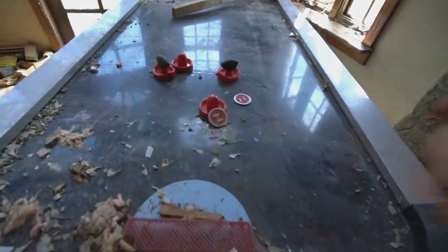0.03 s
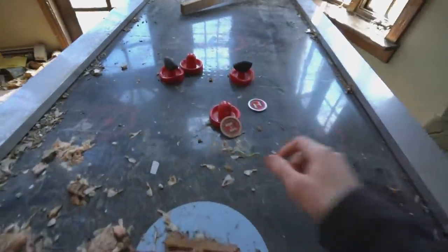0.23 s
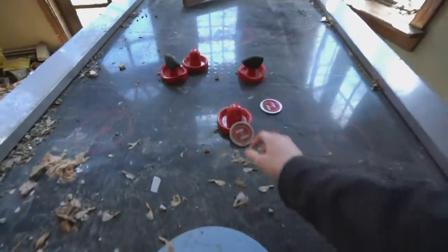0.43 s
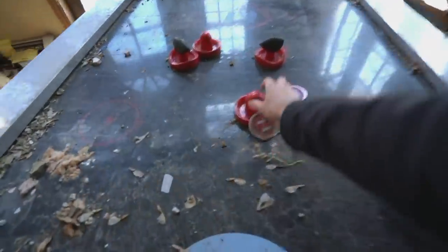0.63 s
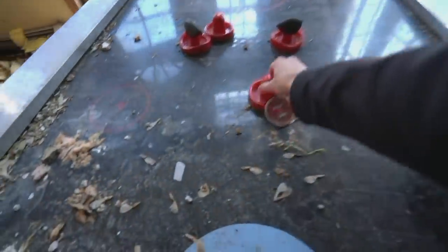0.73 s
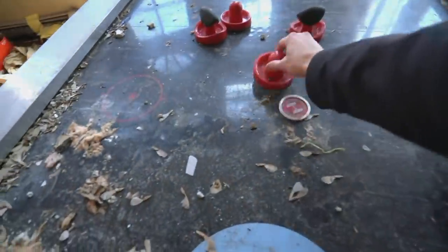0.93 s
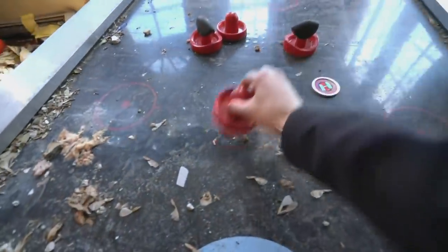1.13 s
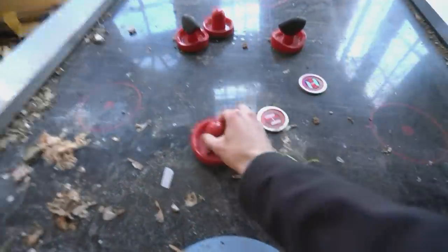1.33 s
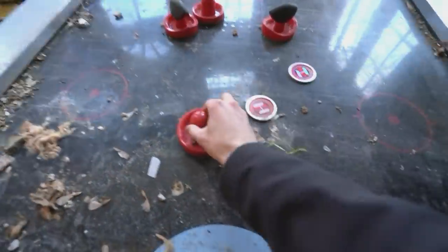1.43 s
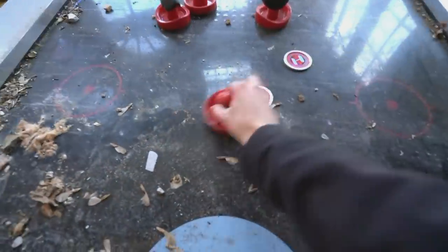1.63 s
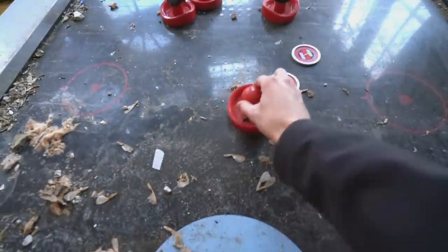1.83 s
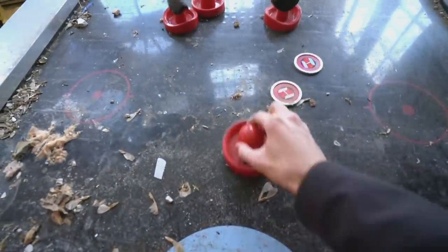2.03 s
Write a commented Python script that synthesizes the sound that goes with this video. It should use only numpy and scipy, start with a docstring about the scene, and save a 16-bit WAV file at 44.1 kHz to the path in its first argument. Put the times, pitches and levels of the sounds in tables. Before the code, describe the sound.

A plastic mallet scrapes across a gritty air hockey table, close by in a bare room. First a sleeve swishes faintly. At 0.8 seconds a puck clacks sharply, then bounces a few times, settling by 1.1. The mallet lands with a soft thump near 1.4. From 1.6 to 1.9 it slides with a brief stuttering squeal, crunching grit and a hollow rumble, then fades.

```python
"""A sleeve swishes as a hand reaches over an air hockey table in a bare room. The lifted mallet tips
a puck off, which clacks and bounces to rest, each impact exciting the damped modes of puck and top.
The mallet is set down with a soft thump and pushed over the dusty top: its cup squeals by stick-slip,
grit crunches under the rim and the friction drives the table's resonances into a rumble."""
import sys
import numpy as np
from scipy import signal
from scipy.fft import rfft, irfft
from scipy.io import wavfile
from scipy.ndimage import uniform_filter1d

SR = 44100
rng = np.random.default_rng(int(sys.argv[2]) if len(sys.argv) > 2 else 0)


def dump_mix(stems):
    """Bounce the given channels to the path in sys.argv[1] as a 16-bit WAV at rate SR."""
    frames = np.atleast_2d(stems).T  # one column per channel
    limited = np.clip(frames, -1, 1)  # hard clip at full scale
    pcm = np.round(limited * 32767).astype(np.int16)
    wavfile.write(sys.argv[1], SR, pcm)


N = 91595

# spectrum of a hard contact, for puck and crumbs (f/Hz, level/dB)
CRACK_SPECTRUM = [(200, -47), (1000, 5.5), (1800, -1.5), (2800, 3), (4200, 0.5), (6500, -3), (7900, -11.5),
                  (8700, 3.5), (9600, -12.5), (16000, -33)]


def undb(db):
    """Amplitude ratio of a level in decibels."""
    return 10 ** (np.asarray(db) / 20)


def unit(x):
    """Normalisation to rms 1."""
    return x / np.sqrt(np.mean(x ** 2))


def clock():
    """Sample times, t/s."""
    return np.arange(N) / SR


def curve(rows):
    """Amplitude envelope interpolated through (t/s, level/dB)."""
    return undb(np.interp(clock(), *np.array(rows).T))


def across(rows):
    """Interpolation of (f/Hz, value) at every bin, on a logarithmic frequency axis."""
    hz, value = np.array(rows).T
    return np.interp(np.log(np.arange(N + 1) * SR / (2 * N) + 1), np.log(hz), value)


def shape(x, gain):
    """Linear filtering: the spectrum is multiplied by a gain per bin."""
    return irfft(rfft(x, 2 * N) * gain)[..., :N]


def colour(x, rows):
    """Minimum-phase, hence causal, filter with the response (f/Hz, level/dB)."""
    cepstrum = irfft(np.log(undb(across(rows))))
    cepstrum[1:N] *= 2
    return shape(x, np.exp(rfft(cepstrum[:N], 2 * N)))


def spread(pair):
    """Interaural coherence: two signals as mid and side, alike in the bass, wide in the treble."""
    side_level = [(40, -26), (130, -16.5), (300, -13), (700, -6), (1500, -4), (3000, 0.5), (12000, -2)]  # side relative to mid (f/Hz, level/dB)
    return pair[0] + shape(pair[1], undb(across(side_level))) * np.array([[1], [-1]])


def walk(rate):
    """Smooth random fluctuation of rms 1, with `rate` new values a second."""
    hold = max(int(SR / rate), 1)
    return unit(uniform_filter1d(rng.standard_normal(N)[np.arange(N) // hold], hold))


def grains(per_s, spread_db):
    """Shot noise: two independent streams of clicks of random size."""
    size = undb(spread_db * np.minimum(rng.exponential(size=(2, N)), 5))
    return size * rng.standard_normal((2, N)) * (rng.random((2, N)) < per_s / SR)


def ring(modes):
    """Impulse response as a sum of damped modes, alternating in sign by pairs."""
    t = clock()
    return sum((-1) ** (k // 2) * undb(db - 60 * t / t60) * np.sin(2 * np.pi * hz * t)
               for k, (hz, db, t60) in enumerate(modes)) / 2


def taps(rows, response):
    """Superposition of one response at each (t/s, level/dB)."""
    out = np.zeros(N)
    for s, db in rows:
        start = int(s * SR)
        out[start:] += undb(db) * response[:N - start]
    return out


def burst(spectrum, decay_s):
    """Contact noise with an exponential decay."""
    return unit(colour(rng.standard_normal(N), spectrum)) * np.exp(-clock() / decay_s)


def air(level_db=-52.5):
    """Stationary noise: the quiet air of the building, strongest in the bass."""
    spectrum = [(15, -51), (25, -3.5), (130, -2.5), (195, -11), (394, -7.5), (714, -13), (1290, -12.5),
                (1400, -21), (1790, -15.5), (2160, -25), (16000, -38)]  # ambient noise (f/Hz, level/dB)
    return undb(level_db) * unit(spread(colour(rng.standard_normal((2, N)), spectrum)))


def room(x, early_db=-4.5, tail_db=-11, early_decay_s=0.027, gap_s=0.0043):
    """Reverberation: early reflections from table and walls, then a diffuse tail decaying by band."""
    decay_times = [(100, 0.17), (350, 0.55), (900, .7), (3000, 0.63), (8000, 0.35), (16000, 0.1)]  # reverberation time (f/Hz, T60/s)
    t, tail = clock(), 0
    noise = spread(rng.standard_normal((2, N)))
    onset = np.clip(t / gap_s - 1, 0, 1)
    for k, (_, t60) in enumerate(decay_times):
        band = across([(row[0], j == k) for j, row in enumerate(decay_times)])
        tail = tail + shape(noise, band) * undb(-60 * t / t60)
    early = spread(grains(per_s=3000, spread_db=2.0)) * np.exp(-t / early_decay_s)
    response = (undb(early_db) * unit(early * onset) + undb(tail_db) * unit(tail * onset)) / np.sqrt(N)
    return shape(x.mean(axis=0), rfft(response, 2 * N))


def sleeve(rise_share=0.2):
    """Friction noise: cloth swishes and brushes against things; fingers scuff on the mallet."""
    swish_levels = [(0, -57), (.13, -58.5), (.2, -54), (.29, -50), (.45, -48.5), (.6, -49), (.74, -53),
                    (.84, -42.5), (1.0, -61), (1.1, -58), (1.21, -57.5), (1.33, -61.5), (1.5, -69),
                    (2.08, -65.5)]  # swish of the moving arm (t/s, level/dB)
    cloth_spectrum = [(59, -65), (100, -13), (166, -10), (193, -6), (389, -2), (801, -5), (1720, -7.5),
                      (2990, -14.5), (5300, -11), (12100, -19), (16000, -25)]  # sliding cloth (f/Hz, level/dB)
    brushes = [(0.124, 0.096, -39.5), (0.772, 0.16, -43), (1.158, 0.13, -46.5), (1.373, 0.024, -47.5)]  # brief touches of cloth and hand (t/s, duration/s, level/dB)
    brush_spectrum = [(47, -22), (80, -1.5), (378, 0.5), (734, -28), (858, 0.5), (1000, -15), (2330, -12.5),
                      (2780, -15.5), (3620, -18), (16000, -34.5)]  # those touches (f/Hz, level/dB)
    scuff_spectrum = [(1000, -20), (5000, -8), (8500, 0), (13000, -3), (16000, -9)]  # fingers taking hold (f/Hz, level/dB)
    cloth = unit(spread(colour(grains(per_s=12000, spread_db=1.0), cloth_spectrum)))
    swish = cloth * curve(swish_levels) * undb(0.39 * walk(28.6))
    scuffs = [taps([(.786, -45)], burst(scuff_spectrum, decay_s=.016)) for _ in range(2)]
    touch = sum(undb(db) * np.interp(clock(), [s, s + rise_share * length, s + length], [0, 1, 0])
                for s, length, db in brushes)
    brushing = unit(spread(colour(grains(per_s=4000, spread_db=2.5), brush_spectrum)))
    return swish + spread(np.array(scuffs)) + touch * brushing


def radiate(x, cutoff_hz=76):
    """Radiation efficiency: the table gives off little deep bass."""
    return signal.sosfilt(signal.butter(4, cutoff_hz, "high", fs=SR, output="sos"), x)


def thumps():
    """Force pulses excite the table's low modes; a longer contact has a duller spectrum."""
    table_modes = [(99, -33, 0.22), (110.8, 9, .25), (219, -27, 0.13), (280, 5, 0.2), (328, -32, .22),
                   (403, -27, 0.17)]  # whole table (f/Hz, level/dB, T60/s)
    pushes = [(0.128, -52, 0.0011), (.775, -43.5, 0.0024), (0.802, -45, 0.0016), (.85, -39, 0.0083),
              (.932, -34, 0.0053), (1.06, -37, 0.0021), (1.375, -27, 0.011), (1.386, -43, 0.011),
              (1.579, -37, 0.0057)]  # soft pushes (t/s, level/dB, contact time/s)
    out, boom = np.zeros(N), ring(table_modes)
    for s, db, contact_s in pushes:
        force = np.hanning(int(contact_s * SR))
        out += taps([(s, db)], signal.fftconvolve(boom, force / force.sum()))
    return out


def thocks(rows, rise_s=0.0012, decay_s=0.0059, noise_db=-5.5):
    """Heavy damping: hollow knocks at (t/s, f/Hz, level/dB), pitched by the spot that is struck."""
    spectrum = [(100, -43), (300, -9.5), (520, -0.5), (750, -0.5), (1300, -2), (2000, -10.5), (4000, -36.5),
                (16000, -40)]  # noise of a knock (f/Hz, level/dB)
    t, out = clock(), np.zeros(N)
    envelope = (1 - np.exp(-t / rise_s)) * np.exp(-t / decay_s)
    noise = undb(noise_db) * unit(colour(rng.standard_normal(N), spectrum))
    for s, hz, db in rows:
        out += taps([(s, db)], envelope * (np.sin(2 * np.pi * hz * t) + np.roll(noise, int(s * SR))))
    return out


def rubbed(modes, per_s):
    """Forced vibration: dense tiny catches drive resonances (f/Hz, bandwidth/Hz, level/dB)."""
    hz = np.arange(N + 1) * SR / (2 * N) + 1
    body = sum((-1) ** k * undb(db) / (1 + 1j * (hz / f - f / hz) * f / width)
               for k, (f, width, db) in enumerate(modes))
    return unit(spread(shape(grains(per_s, spread_db=1.5), body)))


def scrape(fizz_hz=5300, fizz_exponent=0.26):
    """Roughness excitation: grit crunches and shakes the table; the rim catches and crumbs crack."""
    slide_levels = [(1.572, -77, -93, -81), (1.582, -46, -48, -44.5), (1.63, -44, -53, -41.5),
                    (1.68, -30.5, -31, -38.5), (1.715, -29.5, -34.5, -38.5), (1.745, -31, -26, -39.5),
                    (1.762, -29, -25, -38.5), (1.782, -26.5, -32.5, -44.5), (1.82, -39, -41.5, -44.5),
                    (1.86, -47, -36, -52.5), (1.895, -62, -47, -82), (1.93, -80, -75, -76),
                    (2.0, -104, -82, -111)]  # sliding rim (t/s, boom level/dB, hollow level/dB, grit level/dB)
    grit_spectrum = [(400, -39), (1000, 6.5), (1600, -1), (2400, -0.5), (2750, -6.5), (3300, -2.5),
                     (4500, -10.5), (7000, -9.5), (8700, -8), (11000, -11), (16000, -19)]  # grit under the rim (f/Hz, level/dB)
    boom_modes = [(94, 12, -1), (116, 19, -1)]  # lowest table resonances (f/Hz, bandwidth/Hz, level/dB)
    hollow_modes = [(200, 52, -6.5), (280, 42, 1), (342.4, 13, 5), (469, 54, -5.5), (588, 49, -12.5),
                    (690, 28, -11), (820, 42, -6.5), (1012, 80, -14), (1600, 20, -13.5)]  # rubbed table and cup (f/Hz, bandwidth/Hz, level/dB)
    catches = [(1.579, 1550, -33), (1.644, 556, -19.5), (1.6712, 893, -15), (1.7235, 650, -20.5),
               (1.745, 280, -29), (1.757, 290, -25)]  # the rim knocks the top (t/s, f/Hz, level/dB)
    crumbs = [(.139, -48), (.361, -62), (1.437, -57.5), (1.672, -51), (1.7035, -26.5), (1.736, -50),
              (1.782, -44)]  # cracking crumbs (t/s, level/dB)
    boom, hollow, crunch = (curve(np.array(slide_levels)[:, [0, k]]) for k in (1, 2, 3))
    grit = unit(spread(colour(grains(per_s=3900, spread_db=0.5), grit_spectrum)))
    fizz = shape(grit, across([(fizz_hz / 2 ** .5, 0), (fizz_hz * 2 ** .5, 1)]))
    # the finest fizz needs a fast slide, so it follows the level of the hollow rub
    grit = grit - fizz + fizz * (hollow / hollow.max()) ** fizz_exponent
    rumble = boom * rubbed(boom_modes, per_s=1500) + hollow * rubbed(hollow_modes, per_s=2000)
    return rumble + crunch * grit + thocks(catches) + taps(crumbs, burst(CRACK_SPECTRUM, decay_s=0.0033))


def puck(crack_s=0.0041, side_db=-1.5, clack_crack_db=-5, bounce_disc_db=-8):
    """Impact excitation: the puck strikes the mallet, then bounces, and disc and top ring freely."""
    puck_modes = [(1579, 2, 0.1), (2110, -12, 0.05), (2550, -18, 0.086), (2830, -3.5, 0.043),
                  (3287, -7.5, 0.035), (4270, -14, 0.051), (4530, -6, .02), (5920, -8, 0.035),
                  (7600, -39, .05), (8600, -7.5, 0.031), (8600, -13, 0.064)]  # the disc (f/Hz, level/dB, T60/s)
    top_modes = [(337.6, -7, 0.14), (516, 8, 0.014), (600, -20, 0.21), (687, 2, 0.062), (894, -3, 0.073),
                 (930, -5, 0.18), (1111, -9, 0.17), (1405, 1, 0.029)]  # table top under a hard knock (f/Hz, level/dB, T60/s)
    clacks = [(.8288, -16.5), (.8395, -34)]  # puck against mallet (t/s, level/dB)
    # puck against top (t/s, ring level/dB, thock f/Hz, thock level/dB, crack level/dB)
    bounces = [(0.9306, -45, 1222, -22.5, -32.5), (.933, -25.5, 544, -14, -28.5),
               (1.004, -28, 1141, -24.5, -29), (1.008, -19, 728, -14, -58), (1.0603, -18, 866, -16.5, -30),
               (1.096, -24, 910, -30.5, -58), (1.127, -41, 912, -24, -62)]
    s, ring_db, hz, thock_db, crack_db = np.array(bounces).T
    top = taps(zip(s, ring_db), ring(top_modes)) + thocks(zip(s, hz, thock_db))
    disc = ring(puck_modes)
    mid = burst(CRACK_SPECTRUM, crack_s)
    side = undb(side_db) * burst(CRACK_SPECTRUM, crack_s)
    ears = []
    for crack in (mid + side, mid - side):
        on_mallet = taps(clacks, disc + undb(clack_crack_db) * crack)
        on_top = taps(zip(s, crack_db), crack + undb(bounce_disc_db) * disc)
        ears.append(on_mallet + on_top)
    return top + np.array(ears)


def squeal(start_hz=852, sag_hz_per_s=150, jitter=.011, slip_scatter_rad=0.48, flutter_db=1.9):
    """Stick-slip oscillation: the rim grips and lets go at the cup's pitch, which sags during the push."""
    levels = [(1.575, -78), (1.583, -41.5), (1.594, -20.5), (1.617, -26.5), (1.630, -26.5), (1.645, -41),
              (1.669, -30.5), (1.673, -15), (1.682, -25.5), (1.700, -19), (1.708, -34), (1.74, -42),
              (1.757, -22), (1.772, -52), (1.82, -63)]  # squeal of the cup (t/s, level/dB)
    elapsed = np.maximum(clock() - levels[0][0], 0)
    hz = (start_hz - sag_hz_per_s * elapsed) * (1 + jitter * walk(350))
    phase = 2 * np.pi * np.cumsum(hz) / SR + slip_scatter_rad * walk(400)  # slips come early or late
    tone = unit(np.sin(phase) + undb(-29) * np.sin(2 * phase) + undb(-38) * np.sin(3 * phase))
    return tone * curve(levels) * undb(flutter_db * walk(300)) * (elapsed > 0)


def scene(squeal_room_db=-8):
    """Direct and reflected sound add; an interaural level difference sets them a little to the right."""
    balance = [(100, 1.5), (300, 0), (700, -2.5), (1200, -3.5), (2000, -2.5), (9000, -4.5), (14000, -1)]  # left minus right (f/Hz, level/dB)
    direct = radiate(puck() + thumps() + scrape()) + sleeve()
    cup = squeal()
    reflected = room(direct + undb(squeal_room_db) * cup)
    ear_gains = undb(across(balance) * np.array([[1], [-1]]) / 2)
    return shape(direct + cup + reflected, ear_gains) + air()


def record(dry):
    """Band limiting: a steep low-pass removes the treble above 16050 Hz."""
    return signal.sosfilt(signal.ellip(10, .2, 80, 16050, fs=SR, output="sos"), dry)


dry = scene()
out = record(dry)
dump_mix(out)
```